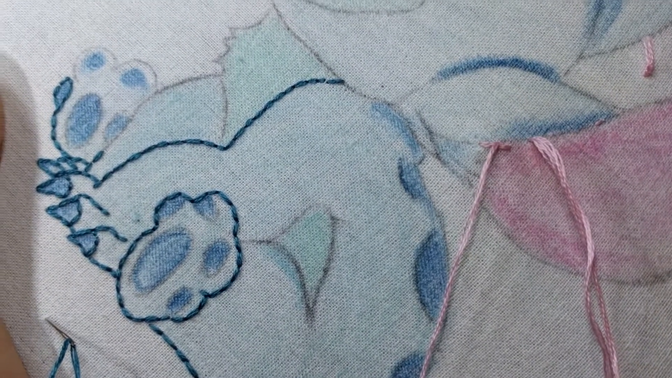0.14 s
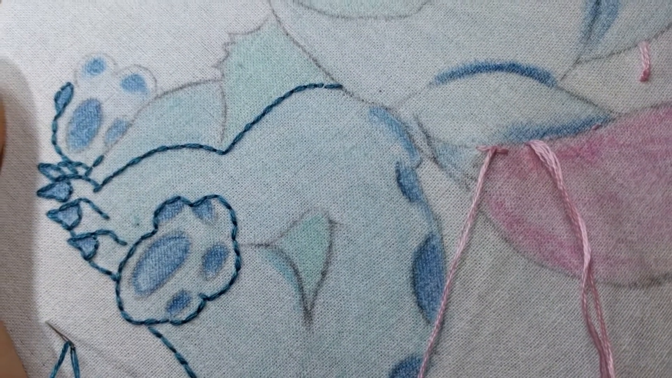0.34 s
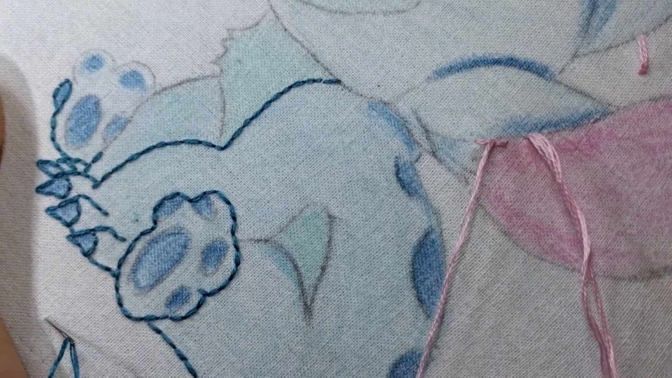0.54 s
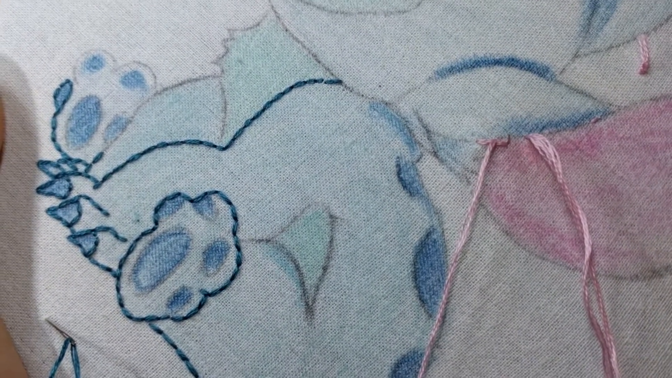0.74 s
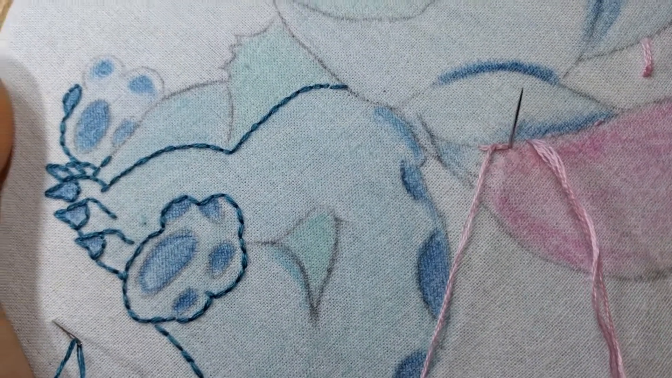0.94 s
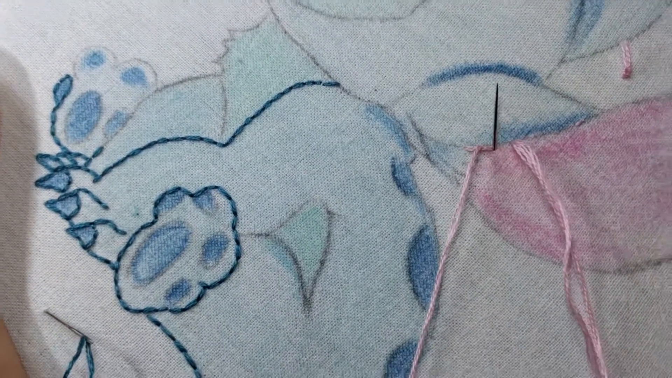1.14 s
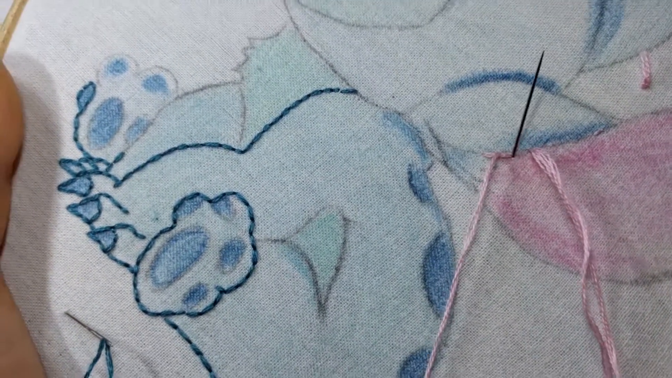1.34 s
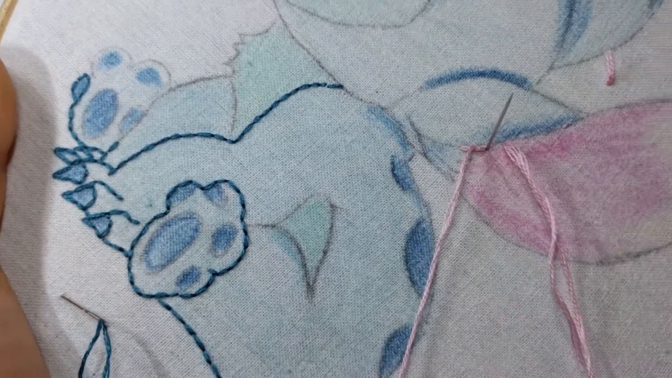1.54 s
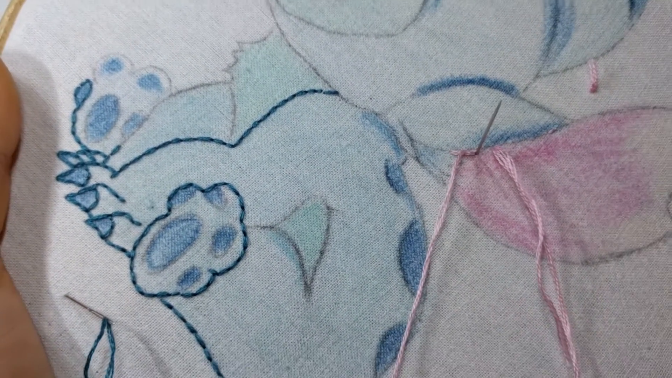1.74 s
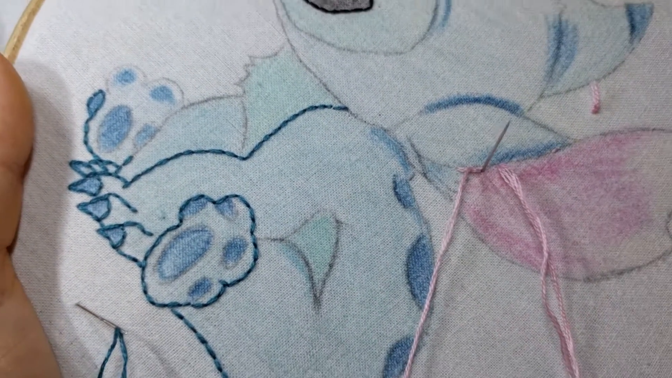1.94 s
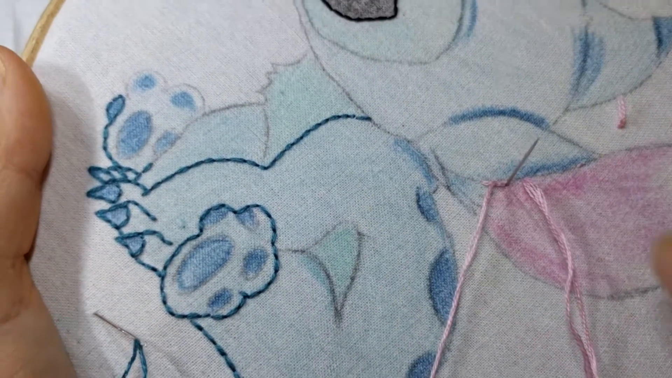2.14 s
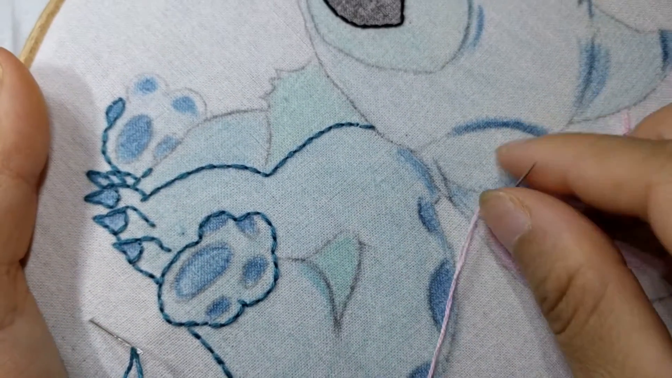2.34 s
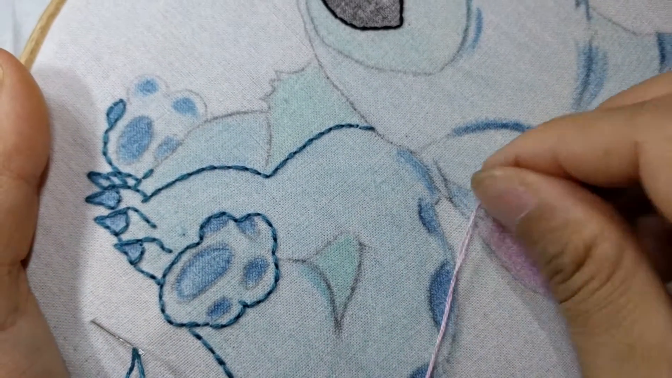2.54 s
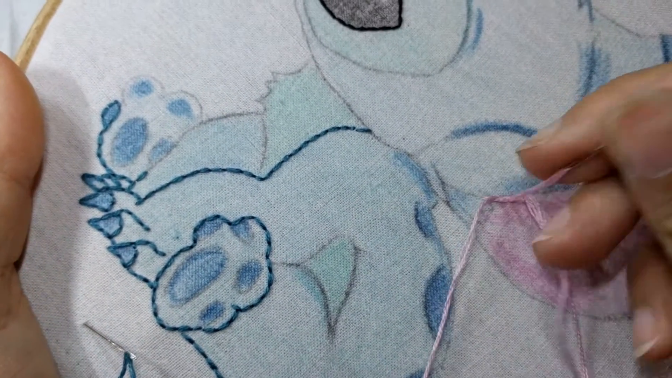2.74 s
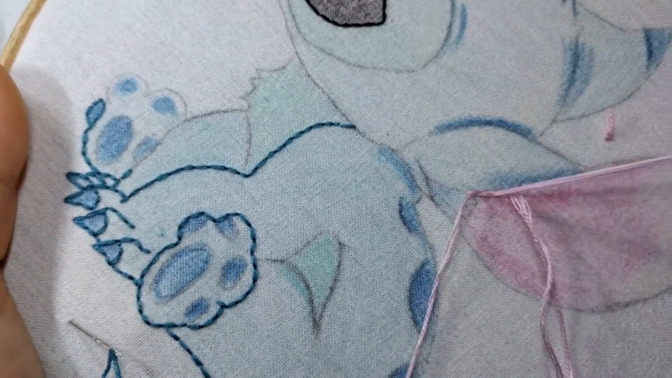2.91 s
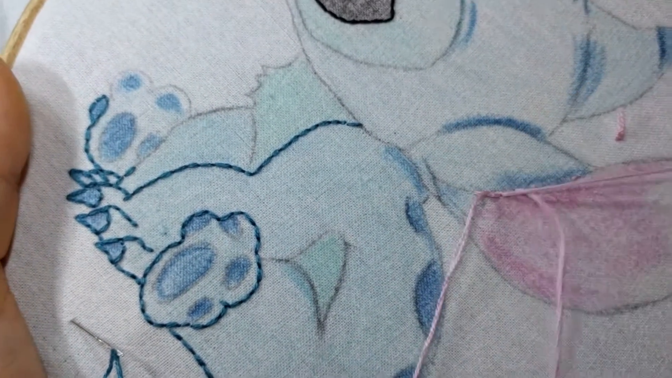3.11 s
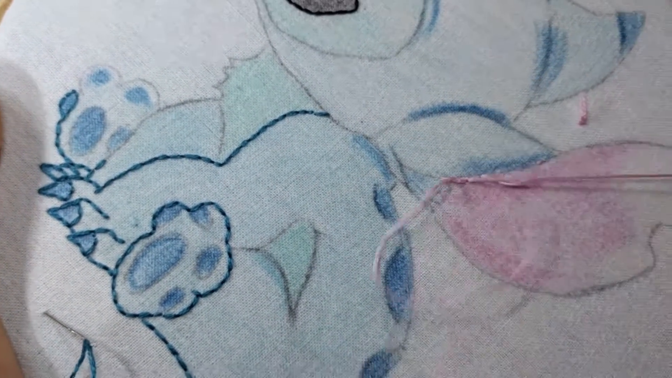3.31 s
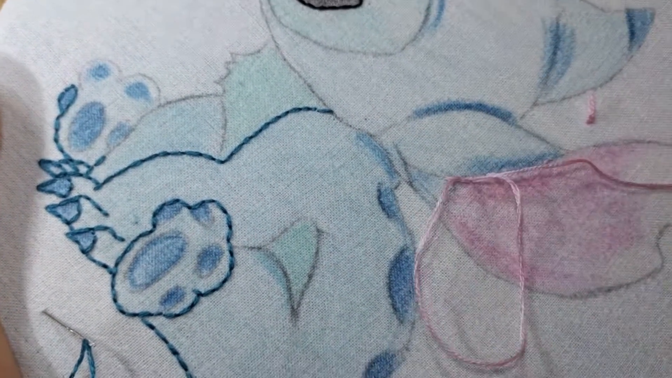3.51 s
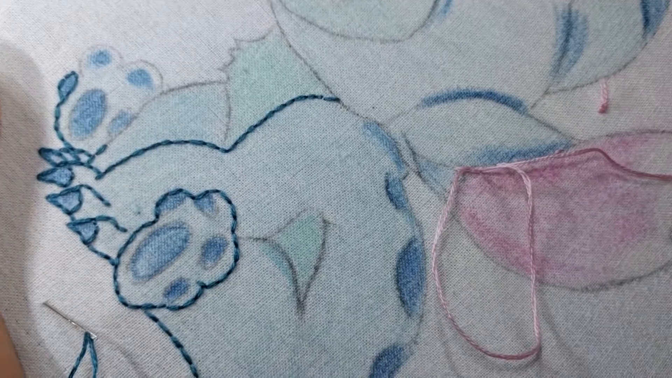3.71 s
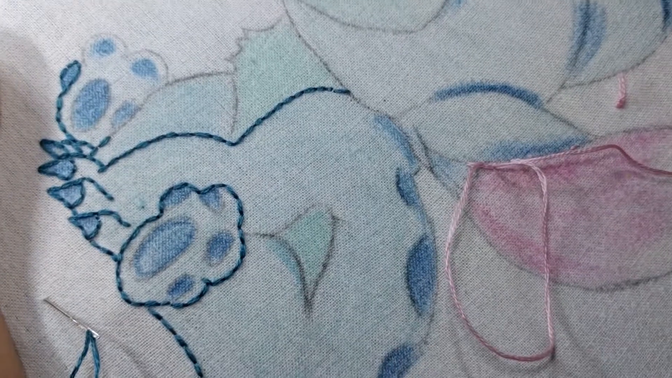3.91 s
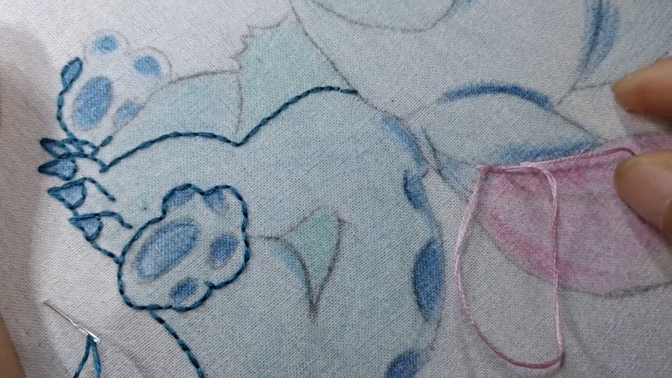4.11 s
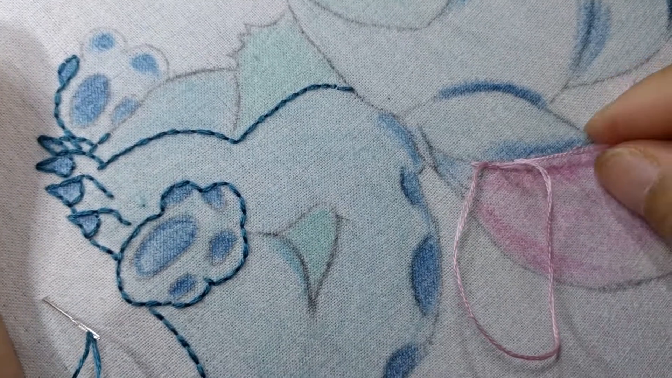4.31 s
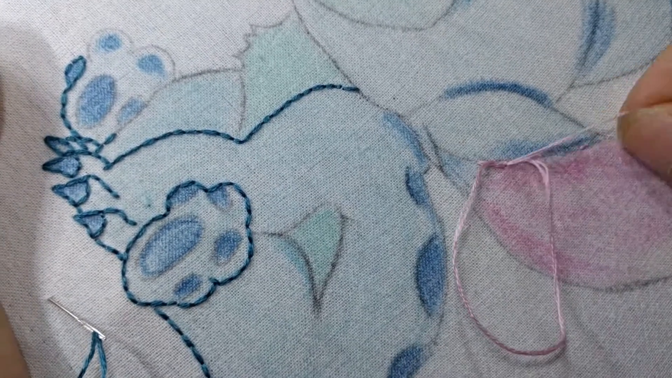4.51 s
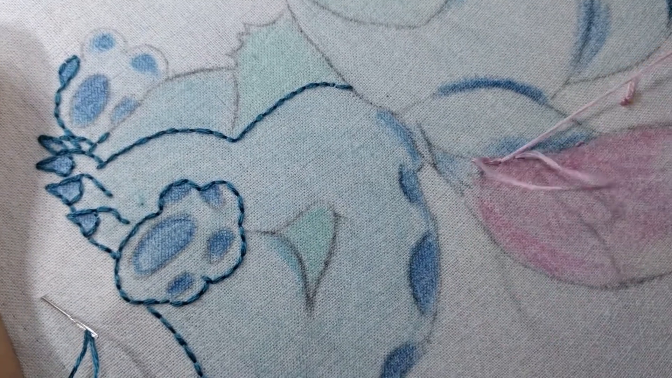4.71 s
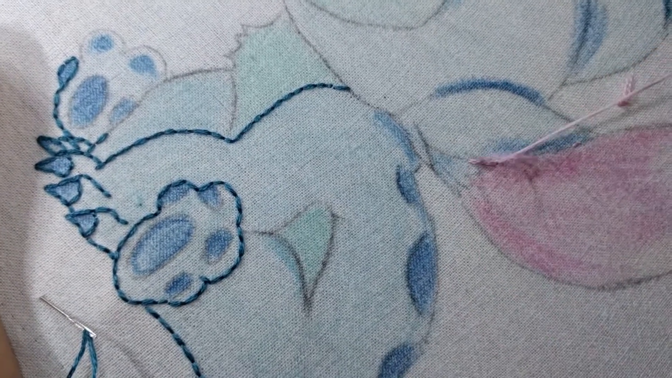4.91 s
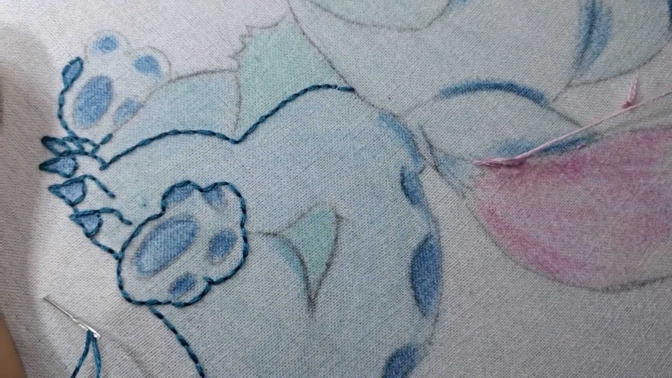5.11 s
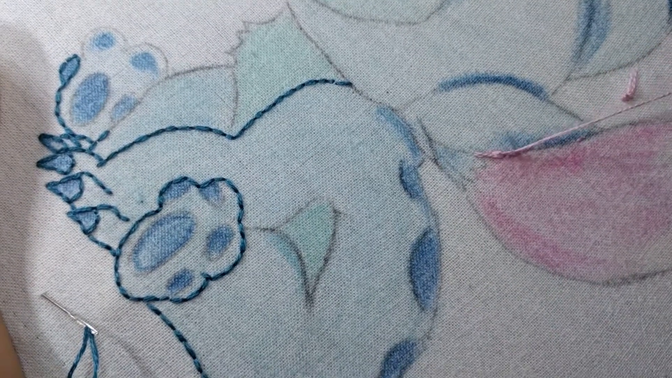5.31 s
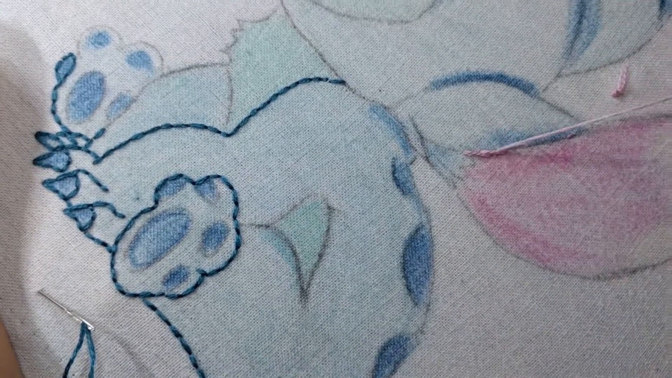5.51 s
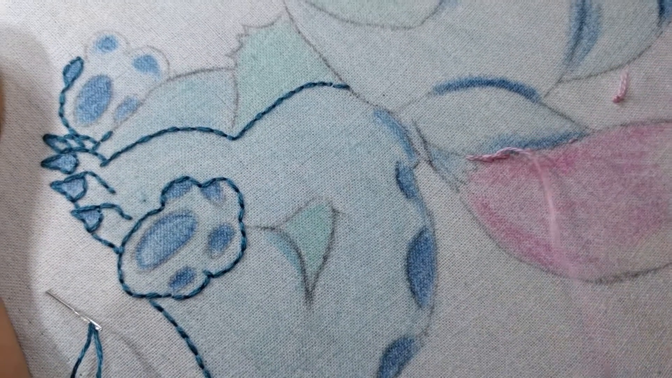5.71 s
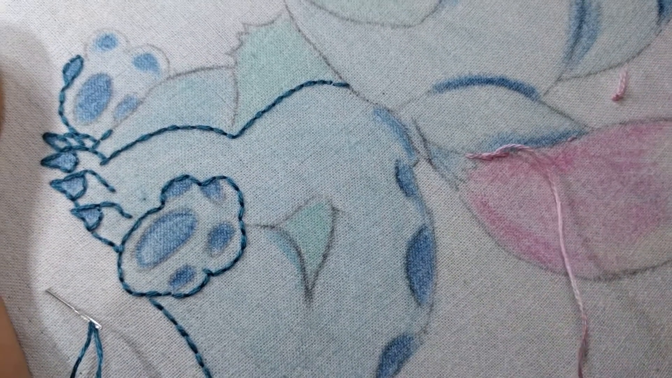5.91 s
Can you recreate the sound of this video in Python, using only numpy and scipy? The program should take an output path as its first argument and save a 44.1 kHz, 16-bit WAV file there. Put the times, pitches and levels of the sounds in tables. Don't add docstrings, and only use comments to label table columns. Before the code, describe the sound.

Hand embroidery heard by a close microphone: a tiny tick, a sharper needle click with light fabric brushing, then a soft knock and a zipping scrape as floss runs through taut cloth. A pause, slight finger rustle, then another thread pull, less hissy and more bumpy and low. It fades into quiet indoor rumble, thin hiss and faint mains buzz.

```python
import sys
import numpy as np
from scipy import signal
from scipy.fft import rfft, irfft
from scipy.io import wavfile
from scipy.ndimage import uniform_filter1d

SR = 44100
rng = np.random.default_rng(int(sys.argv[2]) if len(sys.argv) > 2 else 0)


def transcribe(signal):
    frames = np.atleast_2d(signal).T
    limited = np.clip(frames, -1, 1)
    pcm = np.round(limited * 32767).astype(np.int16)
    wavfile.write(sys.argv[1], SR, pcm)


def how_loud(loudness_db):
    steps = np.asarray(loudness_db, float) / 20
    return 10 ** steps


N = 266972


def rms_one(x):
    return x / np.sqrt(np.mean(x ** 2) + 1e-20)


def cut(x, hz, kind, order=2):
    return signal.sosfilt(signal.butter(order, hz, kind, fs=SR, output="sos"), x)


def resonate(x, modes):
    out = 0
    forces = np.broadcast_to(x, (len(modes), x.shape[-1]))
    for force, (hz, width, db) in zip(forces, modes):
        r = np.exp(-np.pi * width / SR)
        poles = [1, -2 * r * np.cos(2 * np.pi * hz / SR), r * r]
        out = out + how_loud(db) * signal.lfilter([1 - r * r, 0, r * r - 1], poles, force + 1e-18)
    return out


def drift(hz, count):
    lowpass = signal.butter(2, hz, fs=SR / 64, output="sos")
    slow = signal.sosfilt(lowpass, rng.standard_normal(count // 64 + 700))[600:]
    return np.interp(np.arange(count) / 64, np.arange(len(slow)), rms_one(slow))


def pulls():
    # t/s, level/dB
    speeds = [
        [(2.68, -53.5), (2.77, -53), (2.79, -48.5), (2.95, -46.5), (3.09, -51), (3.2, -51), (3.325, -47.5),
         (3.385, -60), (3.42, -73)],
        [(4.47, -73), (4.506, -78), (4.554, -60), (4.6, -60), (4.712, -56), (4.95, -56.5), (5.1, -61.5),
         (5.25, -70), (5.36, -91)],
    ]
    # f/Hz, width/Hz, level/dB
    low_drum = [(56, 16, -1.2), (73, 23, 0.24)]
    high_drum = [(109.3, 7, 11), (126, 25, -5.5)]
    middles = [
        [(179.7, 5.4, 6.5), (234, 33, -3), (268, 65, -14), (336, 29, -1), (400, 15, 1.5), (433, 17, -2),
         (484, 16, -11.5), (540, 25, -19)],
        [(187.7, 4.8, 10.5), (233.5, 7.2, 5.5), (286, 11, -22), (351, 17, -11), (398, 36, -8), (442, 35, -15),
         (480, 15, -17)],
    ]
    upper = [(680, 31, -7), (812, 27, 3.5), (780, 27, 2), (954, 120, 2.5), (1104, 110, -1.5),
             (1398, 75, -2), (1866, 59, -6)]
    # f/Hz, width/Hz, level/dB
    threads = [
        [(2740, 740, 8.5), (3460, 150, 8.5), (4030, 250, 9.5), (5180, 2000, 5), (6430, 640, 1.5),
         (7300, 370, -2), (8800, 1100, 5.5), (10160, 830, 7), (12130, 1800, 3.5), (14400, 1900, 5.5)],
        [(2780, 470, -9), (3420, 1800, -1.5), (4050, 150, -2), (4840, 1200, -8), (5330, 450, -11),
         (6140, 680, -4), (7260, 230, -2.5), (8000, 1100, -5.5), (8800, 540, -1.5), (9900, 1100, -7),
         (11400, 1400, -7), (13700, 1700, -1)],
    ]
    out, count = np.zeros(N), 55000
    for speed, harder_db, middle, thread in zip(speeds, [0, 4], middles, threads):
        start = round(speed[0][0] * SR) - 9000
        coarse = slips(count, per_s=3000, spread_db=4.0, clump_db=-0.53)
        fine = slips(count, per_s=20000, spread_db=4.5, clump_db=0.9)
        fuzz = cut(rng.standard_normal(count), [2500, 15000], "band")
        ringing_thread = shaken(thread, fine, [2300, 16000], wander_db=1.34, steady=0.93)
        layers = [shaken(low_drum, coarse, [40, 90], wander_db=-1.0, steady=1.0),
                  shaken(high_drum, coarse, [85, 150], wander_db=8.0, steady=0.82),
                  shaken(middle[:3], coarse, [150, 310], wander_db=2.5, steady=0.97),
                  shaken(middle[3:], coarse, [310, 560], wander_db=5.5, steady=1.0),
                  shaken(upper, coarse, [650, 2050], wander_db=3.0, steady=0.43),
                  ringing_thread + how_loud(-20) * fuzz]
        out[start:start + count] += np.sum(gains(speed, harder_db, start, count) * layers, axis=0)
    return out


def slips(count, per_s, spread_db, clump_db):
    sizes = how_loud(spread_db * np.minimum(rng.exponential(1, count), 4)) * rng.choice([-1, 1], count)
    happens = rng.random(count) < per_s / SR
    return rms_one(sizes * happens * how_loud(clump_db * drift(36, count)))


def shaken(modes, force, band_hz, wander_db, steady):
    reach = how_loud(wander_db * np.array([drift(5.56, len(force)) for mode in modes]))
    ring = rms_one(cut(resonate(reach * force, modes), band_hz, "band"))
    swell = uniform_filter1d(ring ** 2, size=2000) + 0.064
    return rms_one(ring / swell ** (steady / 2))


def gains(speed, harder_db, start, count):
    # centre f/Hz, level at full speed/dB, share of the speed swing followed
    families = [
        (62.6, -43.5, 0.66),
        (119, -46, 0.95),
        (216, -48.5, 0.73),
        (400, -48, 0.8),
        (1090, -52, 1),
    ]
    # t/s, length/s, level/dB, most shaken f/Hz
    tugs = [(2.77, 0.059, -28, 72), (2.813, 0.12, -39, 281), (2.878, 0.12, -40, 400),
            (2.936, 0.083, -37.5, 191), (2.989, 0.04, -25, 62), (2.994, 0.041, -28.5, 427),
            (3.017, 0.1, -50, 940), (3.036, 0.034, -31, 116), (3.046, 0.076, -36.5, 400),
            (3.082, 0.048, -26.5, 100), (3.104, 0.054, -29, 61), (3.163, 0.066, -41.5, 400),
            (3.24, 0.032, -46, 400), (3.313, .04, -49, 1000), (3.32, .07, -53, 80),
            (4.578, 0.04, -36, 62.4), (4.647, 0.067, -35, 107), (4.738, .07, -37.5, 200),
            (4.77, 0.1, -34.5, 111), (4.84, 0.089, -30.5, 104), (4.897, 0.1, -37.5, 198),
            (4.944, 0.031, -33, 65), (5.016, 0.041, -32, 106), (5.083, 0.073, -32, 67.5),
            (5.163, 0.074, -34, 60), (5.25, 0.036, -37.5, 65)]
    # t/s, length/s, loss/dB
    stalls = [(2.968, .004, 11), (3.097, .005, 6), (3.11, .012, 4), (4.645, .004, 4), (4.686, .006, 4),
              (5.04, .008, 4), (5.072, .01, 4)]
    full_speed_db, tug_reach_db_per_octave = -50, 14.5
    t = (start + np.arange(count)) / SR
    speed_s, speed_db = np.transpose(speed)
    first, last = speed_s[0], speed_s[-1]
    moving = np.clip(np.minimum(t - first, last - t) / .02, 0, 1)
    hiss_db = np.interp(t, speed_s, speed_db)
    for at, length, loss_db in stalls:
        hiss_db = hiss_db - loss_db * np.exp(-((t - at) / length) ** 2)
    swells = []
    for at, length, tug_db, hz in tugs:
        if first < at < last:
            shape = np.cos(np.pi * np.clip((t - at) / length, -1, 1) / 2) ** 2
            swells.append((how_loud(tug_db) * shape, hz))
    levels = []
    for centre_hz, base_db, share in families:
        drag = moving * how_loud(base_db + harder_db + share * (hiss_db - full_speed_db))
        power = drag ** 2
        for swell, hz in swells:
            octaves = abs(np.log2(hz / centre_hz))
            power = power + (swell * how_loud(-tug_reach_db_per_octave * octaves)) ** 2
        levels.append(np.sqrt(power))
    return np.array(levels + [moving * how_loud(hiss_db)])


def brushes():
    # peak t/s, rise/s, fall/s, level/dB, tilt towards the airy top/dB
    strokes = [(.875, 0.046, .1, -72.5, -10), (.93, 0.078, 0.037, -58.5, 1), (1.059, .004, 0.017, -50.5, 6),
               (1.115, 0.17, 0.052, -58, 1), (1.27, 0.062, .08, -59, 0.5), (1.385, 0.043, 0.18, -62.5, 1.5),
               (1.54, 0.13, 0.11, -62.5, 1), (1.7, 0.13, .1, -65, 7.5), (1.8, 0.9, 0.093, -70, -8.5),
               (2.318, 0.0091, .35, -62, 2), (2.565, 0.034, 0.14, -60.5, 1),
               (2.656, 0.077, 0.033, -52, -0.5), (3.685, 0.13, 0.042, -63.5, 6.5),
               (4.22, 0.11, 0.088, -66.5, -0.5), (4.384, 0.069, 0.12, -65.5, 0.5), (5.4, .02, .03, -79, 2),
               (5.7, 0.07, .08, -75, 0)]
    colour_db = [-2.5, -2.5, -1.3]
    bands_hz = [[900, 3600], [3300, 10500], [10000, 16000]]
    hiss = [rms_one(cut(slips(N, per_s=16000, spread_db=2.5, clump_db=1.5), band, "band"))
            for band in bands_hz]
    t, power = np.arange(N) / SR, 0
    for peak_s, rise, fall, db, tilt_db in strokes:
        stroke = how_loud(db - 14 * np.maximum((peak_s - t) / rise, (t - peak_s) / fall))
        colour = how_loud(np.add(colour_db, tilt_db * np.arange(-1, 2)))
        power = power + np.outer(colour, stroke) ** 2
    return np.sum(np.sqrt(power) * hiss, axis=0)


def ticks():
    tick_s = [.302, 1.057, 1.0583, 1.078, 1.109, 1.116, 2.3166, 2.6572, 2.838, 4.237, 5.092, 6.024]
    # peak level/dB, ring f/Hz, width/Hz, t60/s
    tick_rings = [
        [(-42.5, 900, 700, 0.015), (-44, 1700, 1700, 0.016), (-36, 8600, 3240, 0.01), (-36, 13800, 3000, .0075)],
        [(-35.5, 2400, 820, 0.013), (-41.5, 6100, 900, .015), (-38, 14500, 3000, .015)],
        [(-39.5, 5260, 190, 0.014), (-28.5, 10000, 1500, 0.014), (-36, 16000, 3000, .019)],
        [(-54, 3600, 550, 0.043)],
        [(-59, 2950, 660, .021)],
        [(-52, 2970, 360, .064)],
        [(-50, 9000, 8000, .043)],
        [(-50, 5000, 4000, .004), (-45, 1100, 500, .007)],
        [(-47, 9100, 9000, .009)],
        [(-52, 490, 500, 0.024)],
        [(-56, 6000, 5000, .01)],
        [(-53, 5100, 1500, .012), (-40, 10700, 4700, 0.011), (-40.5, 5300, 4000, .0064)],
    ]
    out, t = np.zeros(N), np.arange(2000) / SR
    all_crackles = rng.standard_normal((len(tick_rings), 4, 2000))
    for s, rings, crackles in zip(tick_s, tick_rings, all_crackles):
        i = round(s * SR)
        for (db, hz, width, t60), crackle in zip(rings, crackles):
            crackle[0] = 5
            mode = [(hz, 1.3 * width, 0)]
            ring = resonate(resonate(crackle * how_loud(-60 * t / t60), mode), mode)
            out[i:i + 2000] += how_loud(db) * ring[:N - i] / np.abs(ring).max()
    return out


def knocks():
    # t/s, level/dB, contact f/Hz
    pushes = [(0.304, -44, 1520), (1.058, -35.5, 900), (2.594, -41, 590), (2.611, -37.5, 624),
              (2.6417, -36, 31.3), (2.6576, -17.5, 650), (2.971, -32, 500), (4.238, -37, 1160),
              (4.253, -42, 700), (5.168, -38.5, 604)]
    # f/Hz, width/Hz, level/dB
    knocked = [(63.7, 15, 25), (176, 11, 21), (272, 11, 15), (396, 47, 13.5), (550, 100, 11)]
    push = np.zeros(N)
    for s, db, hz in pushes:
        dent = cut(signal.unit_impulse(4000), hz, "low")
        push[round(s * SR):][:4000] += how_loud(db) * dent / dent.max()
    push = cut(push, 1690, "low")
    spring_back = cut(np.roll(push, 43), 60, "low", order=1)
    return resonate(spring_back, knocked) - push


def room():
    # f/Hz, level per Hz/dB
    spectrum = [(25, -38), (45, -4), (70, 0), (130, -24.5), (230, -17.5), (480, -25.5), (950, -28),
                (1400, -35), (3000, -38), (7500, -41), (10500, -41), (13500, -38.5), (15000, -32.5),
                (16000, -56)]
    # f/Hz, width/Hz, level/dB
    room_modes = [(60, 18, -4), (125.5, 17.3, -6), (227.5, 14.8, -11), (297.5, 11, -17.5),
                  (486.5, 20, -20.5)]
    hz = np.fft.rfftfreq(N, 1 / SR) + 1
    at_hz, db = np.transpose(spectrum)
    shape = how_loud(np.interp(np.log(hz), np.log(at_hz), db))
    broad = irfft(rfft(rng.standard_normal(N)) * shape, N)
    standing = resonate(rng.standard_normal((len(room_modes), N + SR)), room_modes)
    standing = cut(standing, 670, "low")[SR:]
    return how_loud(-53.5) * rms_one(broad) + how_loud(-48.5) * rms_one(standing)


def buzz():
    # t into the cycle/s, length/s, level/dB
    sparks = [(.0183, .0003, -53), (.0008, .0008, -57)]
    mains_hz = 50
    t = np.arange(N) / SR
    gate = sum(how_loud(db) * np.exp(-((t - s) % (1 / mains_hz)) / length) for s, length, db in sparks)
    return how_loud(4.5) * cut(gate * rng.standard_normal(N), 12500, "high")


def scene():
    return (pulls() + brushes() + ticks() + knocks() + room() + buzz())[None]


def roll_off(x):
    return signal.sosfilt(signal.butter(12, 16510, fs=SR, output="sos"), x)


def record(dry):
    edge = signal.ellip(14, .5, 60, 15740, fs=SR, output="sos")
    mix = signal.sosfilt(edge, cut(dry, 49.6, "high", order=3)) - .0006
    return roll_off(mix)


dry = scene()
out = record(dry)
transcribe(out)
```